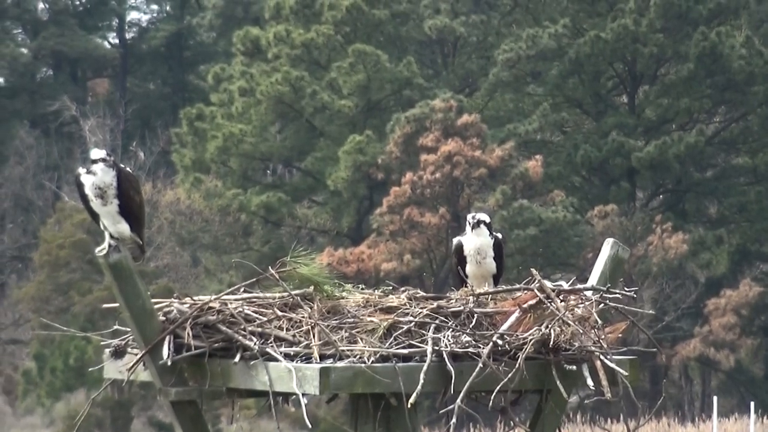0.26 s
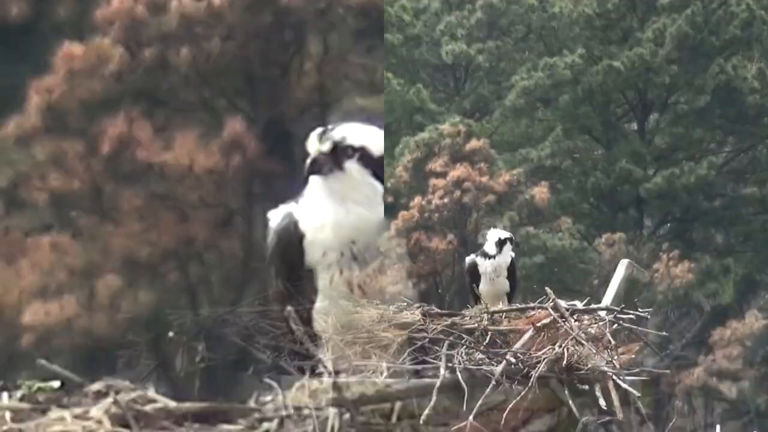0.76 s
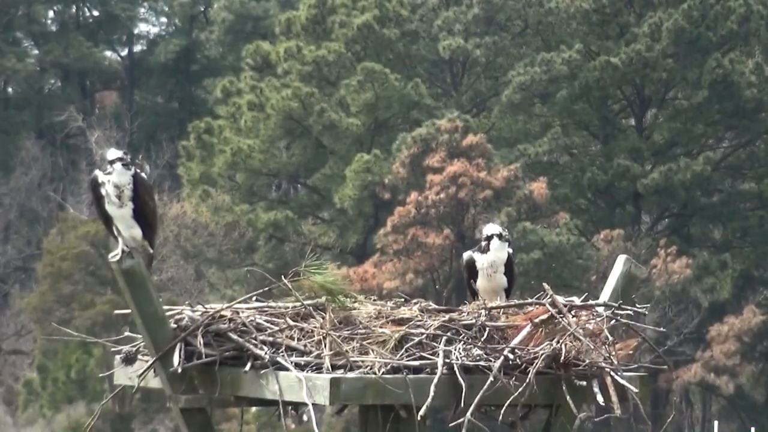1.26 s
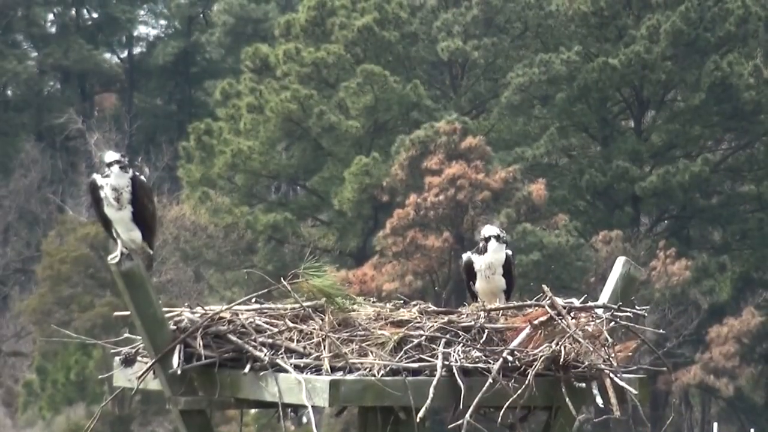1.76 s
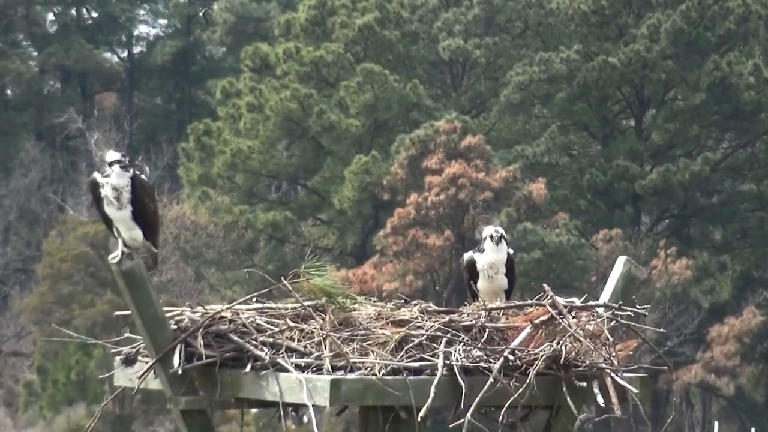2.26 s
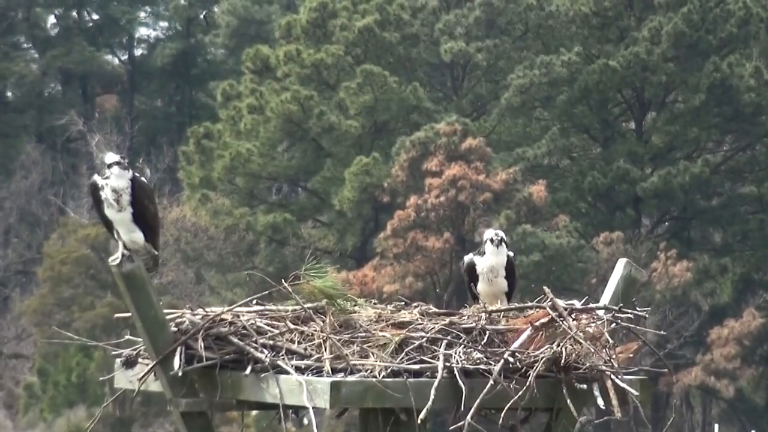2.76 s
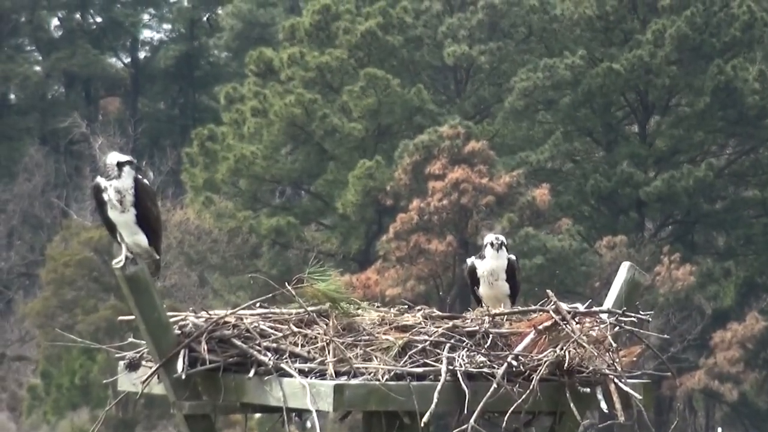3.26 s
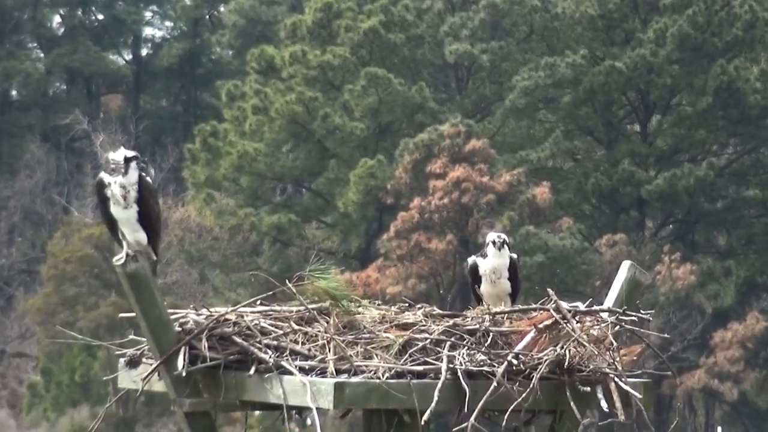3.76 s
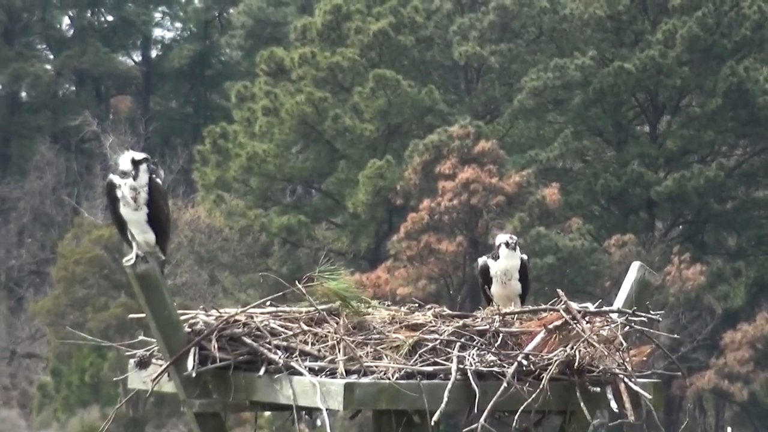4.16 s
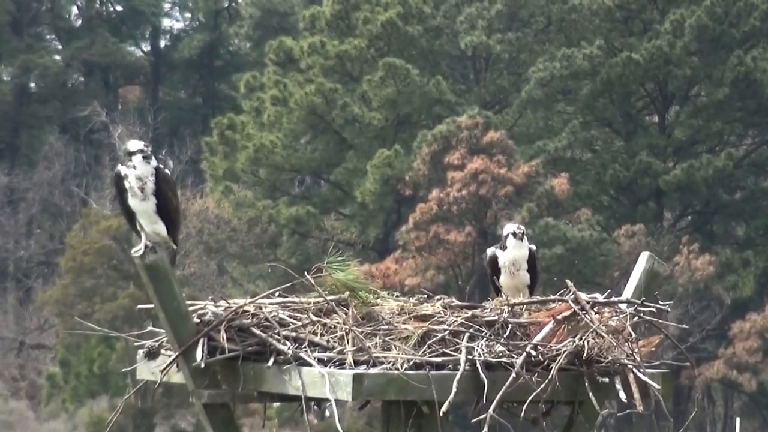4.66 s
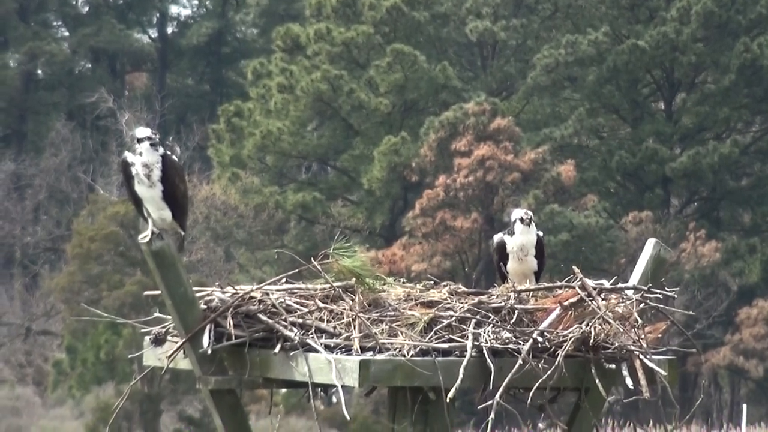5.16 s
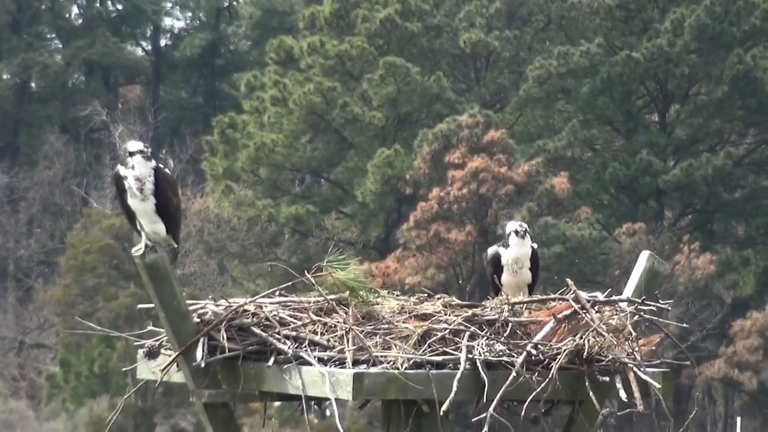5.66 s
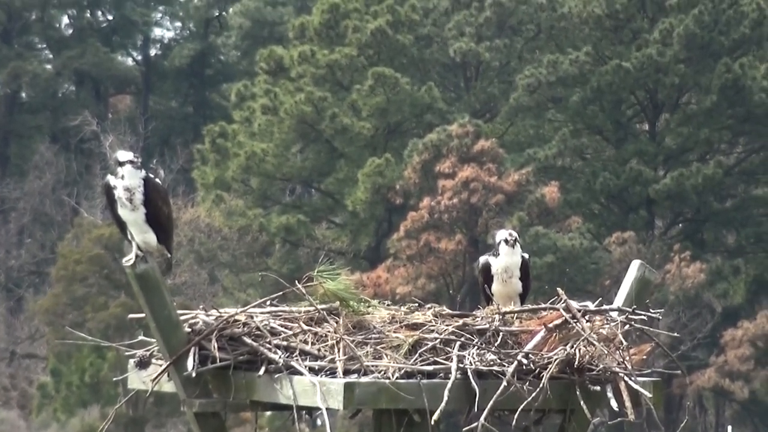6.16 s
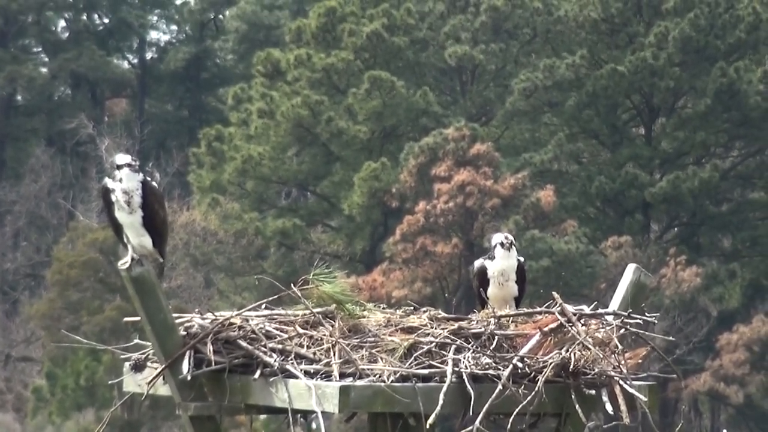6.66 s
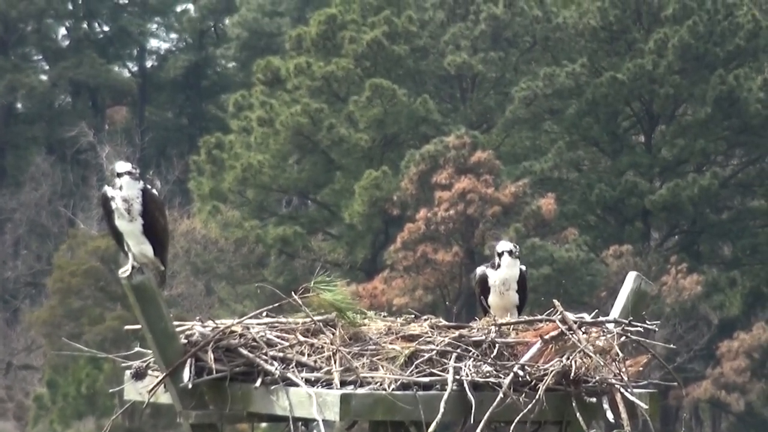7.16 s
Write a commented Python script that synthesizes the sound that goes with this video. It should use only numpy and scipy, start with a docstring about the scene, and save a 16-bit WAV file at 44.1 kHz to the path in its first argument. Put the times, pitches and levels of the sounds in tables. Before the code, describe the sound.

An osprey at a stick nest gives a run of seven sharp, high whistled chirps, about five a second, ending in a softer peep. After a pause a second, longer run starts hoarse and faint, grows loud and clear, then fades. Low wind gusts bump the microphone throughout, strongest at the start and end, over a distant engine hum, airy rush and small dry clicks.

```python
"""At a marsh nest, ospreys call in two runs of whistled chirps, about five a second.
Each chirp is a tone with overtones and rasp: it starts low, breaks upward and arches down.
The tree line answers faintly, as fading noise that smears the calls. Wind buffets the microphone
as gusts of low noise; a far engine hums as a few steady tones under a roar, a rush and a hiss.
Short bursts of noise make small clicks close by and a soft rustle; one sharp pop is a decaying pulse."""
import sys
import numpy as np
from scipy import signal
from scipy.fft import rfft, irfft, next_fast_len
from scipy.io import wavfile
from scipy.ndimage import uniform_filter1d, map_coordinates

SR = 44100
rng = np.random.default_rng(int(sys.argv[2]) if len(sys.argv) > 2 else 0)


def int16_out(signal):
    """Quantize to a 16-bit WAV file."""
    q = np.round(np.clip(np.atleast_2d(signal).T, -1, 1) * 32767)
    wavfile.write(sys.argv[1], SR, q.astype(np.int16))


N = 326340  # length in samples
TOP_HZ = 16550  # nothing is kept above this

# Chirps in two registers. Each row: start in seconds, register break in seconds, end in seconds,
# mid-arch pitch in Hz, level in dB, swell across the arch in dB, overtone in dB against the tone (trimmed later).
CHIRPS = [(0.931, 0.959, 1.023, 2733, -24, 0, -20.5), (1.133, 1.164, 1.228, 2744, -26.5, 3, -28),
          (1.313, 1.343, 1.414, 2780, -25, 3, -25), (1.506, 1.537, 1.608, 2810, -25, 1.5, -24),
          (1.697, 1.728, 1.802, 2798, -25, 4, -22), (1.899, 1.938, 2.002, 2774, -26.5, 2, -24.5),
          (2.111, 2.146, 2.209, 2707, -23.5, 1.5, -21.5), (3.89, 3.913, 3.976, 2895, -29.5, 3, -25),
          (4.067, 4.097, 4.164, 2923, -27, -1.5, -30.5), (4.252, 4.279, 4.352, 2878, -30, 1.5, -20.5),
          (4.44, 4.473, 4.545, 2870, -25.5, -3, -31), (4.625, 4.655, 4.729, 2868, -21.5, 2.5, -22),
          (4.819, 4.852, 4.922, 2873, -18.5, 1, -23), (5.003, 5.036, 5.103, 2840, -17, 0.5, -20.5),
          (5.195, 5.228, 5.295, 2817, -18.5, 0, -22), (5.39, 5.43, 5.488, 2810, -23.5, 4, -24),
          (5.582, 5.647, 5.684, 2680, -24.5, -4, -19)]
# Soft arched notes that end or open a run. Each row: start in seconds, length in seconds,
# top pitch in Hz, level in dB at the loudest.
PEEPS = [(2.342, 0.094, 2100, -30.5), (2.573, .092, 2030, -54), (3.688, 0.038, 2850, -55),
         (3.719, 0.093, 2707, -37)]
# Straight slurs, mostly falling. Each row: start in seconds, length in seconds, start pitch in Hz,
# end pitch in Hz, level in dB at the loudest.
SLURS = [(0.812, 0.016, 2630, 2380, -39.5), (2.413, 0.07, 2460, 1990, -41.5),
         (2.83, 0.047, 2260, 2460, -59.5), (2.885, .025, 2340, 2450, -56), (3.614, .034, 2800, 2620, -54),
         (3.669, 0.042, 1830, 2290, -51.5), (3.734, 0.05, 1730, 1980, -45.5),
         (3.877, 0.038, 2496, 2184, -36.5), (4.392, .061, 1990, 1890, -52.5),
         (5.66, 0.068, 2405, 1960, -41), (5.87, .065, 2800, 2210, -56), (7.022, 0.074, 2744, 2083, -32.5)]
# Faint falling squeaks. Each row: start in seconds, level in dB.
SQUEAKS = [(1.095, -64.5), (2.485, -62.5), (2.725, -65), (4.018, -58.5), (4.233, -56.5), (5.535, -56),
           (5.759, -55), (5.83, -64), (5.992, -59), (7.21, -64), (7.255, -66), (7.285, -65), (7.335, -67)]
# Cracks of the voice, a second whistle above the arch. Each row: start in seconds, length in seconds,
# start pitch in Hz, end pitch in Hz, level in dB.
CRACKS = [(3.914, .04, 3100, 3460, -34.5), (4.111, .028, 3650, 3680, -36)]
# Hoarseness, the basic depth of the quick level flicker. Each row: time in seconds, depth in dB.
HOARSE = [(2.4, .3), (3.7, 1.5), (4.3, 1.4), (4.5, .3), (5.25, .25), (5.7, .9)]
# How the beak colours the voice. Each row: frequency in Hz, gain in dB.
BEAK = [(1000, 1), (5000, -0.5), (5350, 0), (5800, 3), (7200, 3), (7900, 7), (8400, 3), (9400, 3.5),
        (11000, 7.5), (12500, -8), (15500, -2)]
# How long the pines ring. Each row: frequency in Hz, time to fall 60 dB in seconds.
TREES = [(1000, .3), (2700, .6), (5000, .5), (10000, .2)]
# Gusts on the microphone. Each row: time of full strength in seconds, hold in seconds,
# dying-away time constant in seconds, buffet in dB, flutter in dB.
GUSTS = [(0.015, 0.13, .04, -19, -26.5), (0.197, 0.322, .05, -21, -34.5), (0.549, .24, 0.0072, -20, -27),
         (1.611, 0.22, .04, -36, -60), (1.947, 0.12, .04, -26.5, -44.5), (2.849, 0.045, .035, -17, -34),
         (3.015, 0.11, .04, -23.5, -48), (3.182, .3, 0.048, -31.5, -47), (3.692, 0.36, .04, -33, -55),
         (3.969, 0.39, .05, -21, -40.5), (4.403, 0.058, 0.028, -16.5, -36.5), (4.567, .1, 0.068, -35, -48),
         (5.46, 0.27, 0.035, -28, -52.5), (5.93, .9, 0.074, -27.5, -51.5), (6.249, 0.19, .05, -19.5, -44.5),
         (6.968, 0.073, 0.067, -15.5, -31.5), (7.13, 0.054, 0.058, -14, -27.5),
         (7.347, 0.083, 0.044, -16.5, -25.5)]
# Colours of the two wind layers. Each row: frequency in Hz, relative level in dB per Hz.
BUFFET = [(5, -31.5), (12, 12.5), (22, -3.5), (35, -0.5), (55, -13), (90, -25), (160, -40.5), (400, -113)]
FLUTTER = [(35, -14), (65, 5), (90, -1), (150, -4), (220, -15.5), (330, -23.5), (700, -60.5), (2000, -92)]
# Dry clicks. Each row: start in seconds, level in dB before a 4 dB lift, centre in Hz,
# time to fall 60 dB in seconds.
CLICKS = [(0.595, -54.5, 1980, 0.056), (1.43, -51.5, 2980, 0.031), (4.549, -46, 3540, 0.032),
          (4.607, -52, 3000, 0.031), (5.369, -48, 2020, 0.039), (5.564, -38.5, 3680, 0.039),
          (5.666, -40, 1300, 0.035), (5.786, -55, 3500, 0.046), (6.109, -45.5, 2620, 0.034),
          (6.576, -36, 1260, 0.043), (6.578, -43, 4500, 0.024), (6.818, -36.5, 1970, 0.016),
          (6.9794, -40.5, 10900, .025)]
# The sharp pop: start in seconds, level in dB before it is panned, decay time constant in seconds.
POP = (6.9703, -23, .003)
# Colours of the rustle, roar, rush and hiss. Each row: frequency in Hz, relative level in dB per Hz.
RUSTLE = [(2500, -23), (4200, 4), (5200, -3), (7500, -21.5)]
ROAR = [(100, -14.5), (220, 0.5), (290, 3), (345, -4), (410, 4.5), (480, -4), (555, 0.5), (700, -9.5),
        (1100, -24), (3000, -43.5)]
RUSH = [(300, -10.5), (700, -1.5), (1000, 0), (1350, -1.5), (1800, -8.5), (2500, -8.5), (3300, -13.5),
        (4500, -18.5), (8000, -20.5), (16000, -31)]
HISS = [(1000, -21), (5000, -21.5), (11000, 1), (11600, 4), (16500, 3)]
# Tones of the far engine. Each row: frequency in Hz, level in dB before a 1.5 dB lift.
HUM = [(86, -49.5), (129, -52), (172, -57.5), (215, -62.5)]
# Slow drift of the background; only the departure from its average is used.
# Three stretches of rows, each row: time in seconds, level in dB.
BACKGROUND = [
    [(0.0, -77.5), (0.434, -79.5), (0.77, -80.5)],
    [(0.87, -73.5), (1.95, -74), (6.92, -67.5)],
    [(7.08, -71.5), (7.244, -73.5), (7.4, -72)],
]
# Swells of the far roar. Each row: peak in seconds, half width in seconds, rise in dB.
ROAR_SWELLS = [(.65, 0.14, 6.5), (3.5, 0.4, 5), (6.3, 0.49, 6.5)]

LOW_MODE_HZ, HIGH_MODE_HZ = 2152, 2780  # the two natural pitches of the syrinx, the bird's voice box
CLIMB_S = 0.026  # time constant of the climb in the low register
BREAK_UNDER_HZ, END_UNDER_HZ = 72.5, 312  # how far the arch begins and ends below its mid pitch
BREAK_S, SINK_DB = 0.0011, 11.5  # how fast the level jumps at the break; how far it sinks at the end
# An ordinary chirp: high register level, low register level, rasp against the tone
USUAL_DB, LOW_REGISTER_DB, RASP_DB = -26.5, -35.5, -22
# dB per dB: effort lifts the low register and clears the rasp
LOW_FOLLOWS, RASP_CLEARS = .6, .2
# dB per dB: hoarseness also lifts the low register and adds rasp
LOW_PER_HOARSE, RASP_PER_HOARSE = 3.35, 3.5
FIZZ_DB, FIZZ_GROWS = -40, 1  # white hiss against the tone in an ordinary chirp; dB per dB of effort
PEEP_ARCH = .125  # share by which both ends of a peep lie below its top
CRACK_JITTER = .014  # pitch unsteadiness of a crack, as a share of its pitch
GUST_ATTACK_S = 0.037  # rise time of every gust
CALM_BUFFET_DB, CALM_FLUTTER_DB = -46.5, -50  # the light air between gusts
RUSTLE_S, RUSTLE_WIDTH_S, RUSTLE_DB = 6.47, 0.078, -63  # middle, half length, base level
ROAR_DB, RUSH_DB, HISS_DB = -55, -58, -68  # base levels, before drift and swells


def amp(db):
    """Decibels to gain."""
    return 10 ** (np.asarray(db) / 20)


def unit(x):
    """Scale to an average (rms) strength of 1."""
    return x / np.sqrt(np.mean(x ** 2) + 1e-20)


def along(points, hz):
    """Read a value between (Hz, value) points, on a log frequency axis."""
    f, v = np.transpose(points)
    return np.interp(np.log(hz + 1), np.log(f + 1), v)


def wobble(rate, size=N):
    """A smooth random curve with this many random points a second."""
    points = rng.standard_normal(int(size * rate / SR) + 4)
    return map_coordinates(points, [np.arange(size) * rate / SR])


def filtered(x, response):
    """Change each frequency of x by a response, given as a function of Hz."""
    m = next_fast_len(N + SR // 2)
    return irfft(rfft(x, m) * response(np.fft.rfftfreq(m, 1 / SR)), m)[..., :N]


def noise(spectrum, side_db):
    """Coloured stereo noise of rms 1; more side signal makes it wider."""
    mid, side = filtered(rng.standard_normal((2, N)), lambda hz: amp(along(spectrum, hz)))
    side = amp(side_db) * side
    return unit(np.array([mid + side, mid - side]))


def add(track, s, sound):
    """Mix a sound into a track at time s."""
    part = track[round(s * SR):][:len(sound)]
    part += sound[:len(part)]


def gate(t, rise, fall):
    """Smooth opening and closing of a sound, in seconds."""
    opening = np.sin(np.pi / 2 * np.clip(t / rise, 0, 1)) ** 2
    closing = np.sin(np.pi / 2 * np.clip((t[-1] - t) / fall, 0, 1)) ** 2
    return opening * closing


def ospreys(lag_s=.000046, pan_db=-0.6):
    """The beak colours the calls; they reach the two microphone ports a hair apart."""
    voice = filtered(cracked(chirps()) + whistles(), lambda hz: amp(along(BEAK, hz)))
    # opposite phase shifts delay one side against the other
    direct = filtered(voice, lambda f: np.exp(1j * np.pi * f * lag_s * np.array([[1], [-1]])))
    return direct * amp([[pan_db], [-pan_db]]) + tree_line(voice)


def chirps(low_hz=1830, rise_hz=540, low_overtone_db=-16, low_third_db=-12, reed_db_per_s=190):
    """The pitch climbs in the low register, flips abruptly to the high one and arches down."""
    out = np.zeros(N)
    for start, flip, end, mid_hz, db, swell_db, overtone_db in CHIRPS:
        t = np.arange(round((end - start + .004) * SR)) / SR
        lead = flip - start
        effort_db = db - USUAL_DB
        hoarse_db = np.interp(start, *np.transpose(HOARSE))
        # progress from 0 to 1 through the low climb, then through the high arch
        climb = np.clip(t / lead, 0, 1)
        u = np.clip((t - lead) / (end - flip), 0, 1)

        high = (1 + np.tanh((t - lead) / .0006)) / 2
        low_pitch = low_hz + rise_hz * (1 - np.exp(-t / CLIMB_S))
        high_pitch = arch(u, mid_hz - BREAK_UNDER_HZ, mid_hz, mid_hz - END_UNDER_HZ)
        pitch = (1 - high) * low_pitch + high * high_pitch

        # the level jumps at the break, swells or fades, and sinks as the pitch falls
        low_db = LOW_REGISTER_DB + LOW_FOLLOWS * effort_db + LOW_PER_HOARSE * hoarse_db
        low_db = low_db + 6 * (climb - .65)
        high_db = db + swell_db * np.clip(2 * u - 1, -.5, .5)
        high_db = high_db - SINK_DB * np.clip((u - .7) / 0.25, 0, 1)
        jump = (1 + np.tanh((t - lead) / BREAK_S)) / 2
        level = amp((1 - jump) * low_db + jump * high_db) * gate(t, rise=0.016, fall=0.01)
        # the level flickers most as the tone starts and as it falls away, where it also grows reedier
        shaky_db = .9 * (1 - high) + 2.2 * u ** 6
        level = level * flicker(start, len(t), shaky_db)

        # a low register that is held longer is brighter
        low_bright_db = low_overtone_db + reed_db_per_s * (lead - .03) + 9 * (.5 - climb)
        bright_db = (1 - high) * low_bright_db + high * (overtone_db - 1.5 + 12 * u ** 3)
        third_db = (1 - high) * low_third_db + high * (-18 + 9 * u ** 2)
        rasp_db = RASP_DB - RASP_CLEARS * effort_db + RASP_PER_HOARSE * hoarse_db
        rasp_db = rasp_db + 3 * (1 - high) + 4 * u ** 4
        jitter = .004 * high + 0.017 * (1 - high)
        fizz_db = FIZZ_DB + FIZZ_GROWS * effort_db
        add(out, start, level * syrinx(pitch, bright_db, third_db, rasp_db, jitter, fizz_db=fizz_db))
    return out


def arch(u, first, middle, last):
    """A parabola through three pitches as u goes from 0 to 1."""
    return first * (1 - u) * (1 - 2 * u) + 2 * middle * 2 * u * (1 - u) + last * u * (2 * u - 1)


def flicker(start, size, extra_db=0):
    """The quick uneven level of a hoarse voice."""
    depth_db = np.interp(start, *np.transpose(HOARSE)) + extra_db
    return amp(depth_db * wobble(240, size))


def syrinx(pitch, overtone_db, third_db, rasp_db, jitter, difference_db=-11, sum_db=-7,
           upper_sum_db=-18, air_db=-9, fizz_db=-41):
    """One mode whistles; the other mutters as narrow noise and mixes with it into side tones."""
    size = len(pitch)
    phase = 2 * np.pi * np.cumsum(pitch * (1 + jitter * wobble(900, size))) / SR
    upper_db = overtone_db + third_db
    levels = [overtone_db, upper_db, upper_db - 12, upper_db - 23.5]  # overtones 2 to 5
    overtones = sum(amp(db + 2.5 * wobble(110, size)) * np.sin(k * phase)
                    for k, db in enumerate(levels, 2))
    # the idle mode is the one that does not whistle now
    high = pitch > 2390
    idle_hz = np.where(high, LOW_MODE_HZ, HIGH_MODE_HZ)
    mutter = wobble(420, size) + 1j * wobble(420, size)
    idle = mutter * np.exp(2j * np.pi * np.cumsum(idle_hz) / SR)
    # multiplying turning phases adds their frequencies; the conjugate subtracts
    turn = np.exp(1j * phase)
    sides = idle * (amp(sum_db) * turn + amp(upper_sum_db) * turn ** 2)
    sides = sides + amp(difference_db) * idle.conj() * turn ** 2 * high
    # the modes nearly stop mixing when the voice cracks above its usual range
    mixing = np.interp(pitch, [2900, 3150], [1, .15])
    breath_band = signal.butter(2, [1800, 5000], "band", fs=SR)
    air = unit(signal.lfilter(*breath_band, rng.standard_normal(size)))
    rasp = (idle + mixing * sides).real + amp(air_db) * air
    tone = np.sqrt(2) * (np.sin(phase) + overtones)
    return tone + amp(rasp_db) * rasp + amp(fizz_db) * rng.standard_normal(size)


def cracked(voice, steals_db=-10, rasp_db=-13):
    """Where the voice cracks, a harsh second whistle takes the breath from the main tone."""
    dip_db, second = np.zeros(N), np.zeros(N)
    for start, length, first_hz, last_hz, db in CRACKS:
        t = np.arange(round(length * SR)) / SR
        opening = gate(t, rise=0.0032, fall=0.0074)
        pitch = np.linspace(first_hz, last_hz, len(t))
        tone = syrinx(pitch, -34.5, -15, rasp_db, CRACK_JITTER)
        add(second, start, amp(db) * opening * flicker(start, len(t), extra_db=0.5) * tone)
        add(dip_db, start, steals_db * opening)
    return voice * amp(dip_db) + second


def whistles():
    """Reedy arched peeps, purer slurs and tiny squeaks, all from the same voice model."""
    out = np.zeros(N)
    for start, length, top_hz, db in PEEPS:
        u = np.linspace(-1, 1, round(length * SR))
        pitch = top_hz * (1 - PEEP_ARCH * u ** 2)
        peep = note(pitch, overtone_db=-15.0, rasp_db=-18.5)
        add(out, start, amp(db) * flicker(start, len(u)) * peep)
    for start, length, first_hz, last_hz, db in SLURS:
        pitch = np.linspace(first_hz, last_hz, round(length * SR))
        slur = note(pitch, overtone_db=-30.5, rasp_db=-38.5)
        add(out, start, amp(db) * flicker(start, len(pitch)) * slur)
    t = np.arange(round(0.03 * SR)) / SR
    for start, db in SQUEAKS:
        squeak = syrinx(np.linspace(3480, 2900, len(t)), -18.5, -2.5, -8.5, jitter=0.031)
        add(out, start, amp(db) * gate(t, rise=0.0025, fall=0.021) * squeak)
    return out


def note(pitch, overtone_db, rasp_db, sag_db=13.0, late_bright_db=7):
    """A whistled note: loudest in the middle, brighter towards its end."""
    t = np.arange(len(pitch)) / SR
    u = t / t[-1]
    swell = amp(-sag_db * (2 * u - 1) ** 2) * gate(t, rise=0.0021, fall=0.0052)
    return swell * syrinx(pitch, overtone_db + late_bright_db * (u - .5), -15.5, rasp_db, jitter=0.012)


def tree_line(x):
    """A weak quick answer from the ground and platform, then a thin diffuse tail from the pines."""
    # fade each frequency of a noise burst at its own speed
    hz, t, z = signal.stft(rng.standard_normal((2, SR)), SR, nperseg=256)
    faded = z * amp(-60 * t / along(TREES, hz)[:, None])
    tail = signal.istft(faded, SR, nperseg=256)[1][:, :SR]
    early = rng.standard_normal((2, SR)) * amp(-60 * np.arange(SR) / SR / .14)  # falls 60 dB in 0.14 s
    answer = amp(-30) * unit(tail) + amp(-22) * unit(early)
    return signal.fftconvolve(x[None], answer / np.sqrt(SR), axes=1)[:, :N]


def wind():
    """Gusts push slow eddies over the ports, with a quicker flutter on top; each rises, holds and dies away."""
    t = np.arange(N) / SR
    buffet, flutter = amp(CALM_BUFFET_DB), amp(CALM_FLUTTER_DB)
    for s, hold, release, buffet_db, flutter_db in GUSTS:
        rise = np.clip(1 + (t - s) / GUST_ATTACK_S, 0, 1)
        push = rise * np.exp(-np.maximum(t - s - hold, 0) / release)
        # overlapping gusts add as powers
        buffet = np.hypot(buffet, amp(buffet_db) * push)
        flutter = np.hypot(flutter, amp(flutter_db) * push)
    eddies = noise(BUFFET, side_db=-6.5)
    # even out the eddies' own loudness so that the gusts set it
    power = uniform_filter1d(np.mean(eddies ** 2, axis=0), size=SR // 12)
    eddies = eddies / np.sqrt(np.abs(power) + 1e-6)
    return buffet * eddies + flutter * noise(FLUTTER, side_db=-3.0) * amp([[-1.2], [1.2]])


def clicks(attack_s=0.0019):
    """Short dry ticks of band-limited noise close by, and one sharp pop, a decaying pulse."""
    ticks, pop, t = np.zeros(N), np.zeros(N), np.arange(SR // 8) / SR
    for s, db, hz, t60 in CLICKS:
        band = signal.butter(2, [hz / 2, min(hz * 1.27, TOP_HZ)], "band", fs=SR)
        fade = amp(db + 4.0 - 60 * t / t60) * (1 - np.exp(-t / attack_s))
        add(ticks, s, fade * unit(signal.lfilter(*band, rng.standard_normal(len(t)))))
    s, db, decay = POP
    add(pop, s, amp(db) * np.exp(-t / decay))
    return ticks * amp([[-1], [1]]) + pop * amp([[-7], [4]])


def rustle(grain_db=4):
    """A brief uneven swish of noise, perhaps of nest twigs."""
    swell = np.exp(-((np.arange(N) / SR - RUSTLE_S) / RUSTLE_WIDTH_S) ** 2)
    return amp(RUSTLE_DB + grain_db * wobble(90)) * swell * noise(RUSTLE, side_db=-5.5)


def distance():
    """A far low roar with an engine's hum, the rush of air in the trees and a fine hiss."""
    t = np.arange(N) / SR
    level_db = np.interp(t, *np.transpose(np.vstack(BACKGROUND)))
    drift_db = level_db - level_db.mean()
    swell_db = sum(db * np.exp(-((t - s) / width) ** 2) for s, width, db in ROAR_SWELLS)
    roar_db = ROAR_DB + 0.67 * drift_db + swell_db + 0.63 * wobble(4.5)
    roar = amp(roar_db) * noise(ROAR, side_db=-8.5)
    rush = amp(RUSH_DB + 0.96 * drift_db + 0.87 * wobble(9)) * noise(RUSH, side_db=-3.5)
    # all hum tones share one slightly uneven clock, so their pitches waver together
    clock = np.cumsum(1 + 0.00757 * wobble(5.2)) / SR
    hum = sum(amp(db + 1.5 + 2.2 * wobble(8.1)) * np.sin(2 * np.pi * hz * clock) for hz, db in HUM)
    hiss = amp(HISS_DB + drift_db) * noise(HISS, side_db=-12)
    return (roar + rush + hum) * amp([[-1.6], [1.3]]) + hiss


def scene():
    """Birds, wind, clicks, a rustle and the distance."""
    return ospreys() + wind() + clicks() + rustle() + distance()


def record(dry):
    """Fade both ends briefly so that they do not click, and remove all above the top frequency."""
    edges = gate(np.arange(N) / SR, rise=.004, fall=.006)
    return filtered(dry * edges, lambda hz: hz < TOP_HZ)


dry = scene()
out = record(dry)
int16_out(out)
```